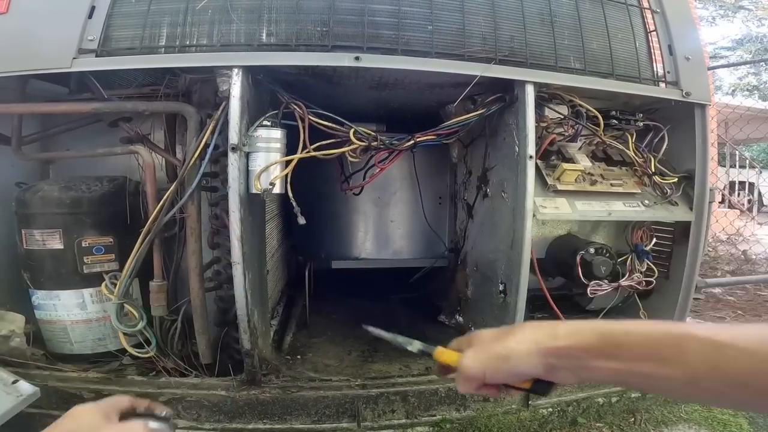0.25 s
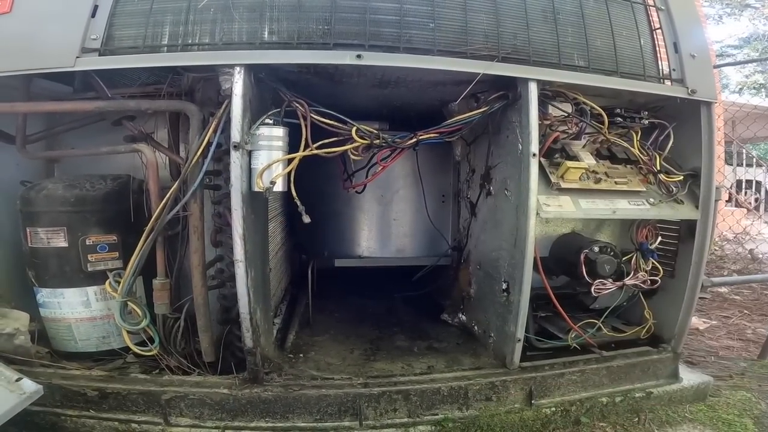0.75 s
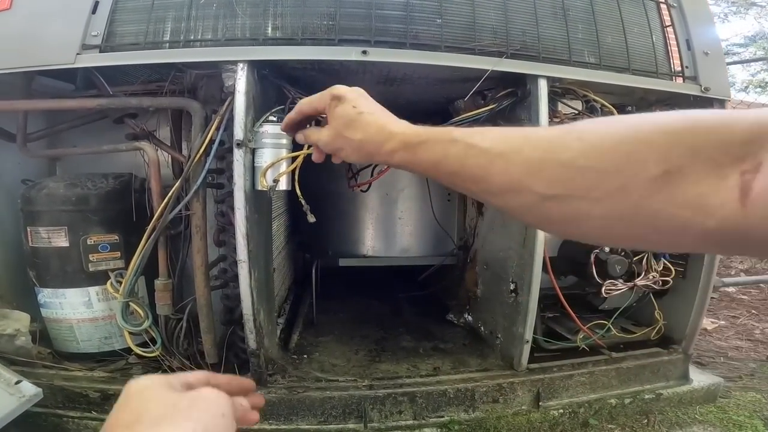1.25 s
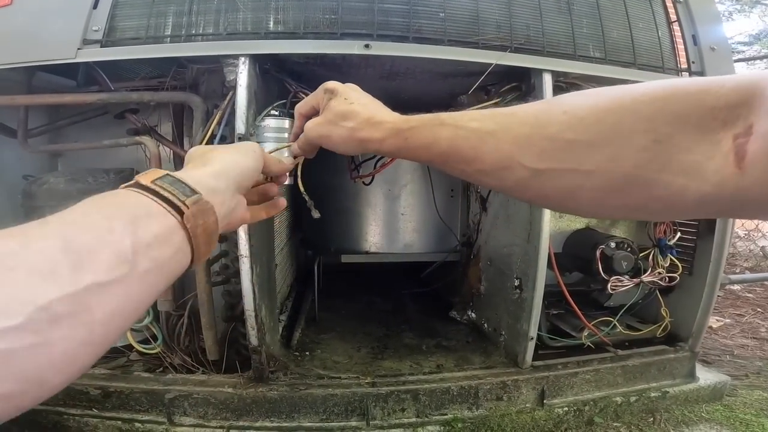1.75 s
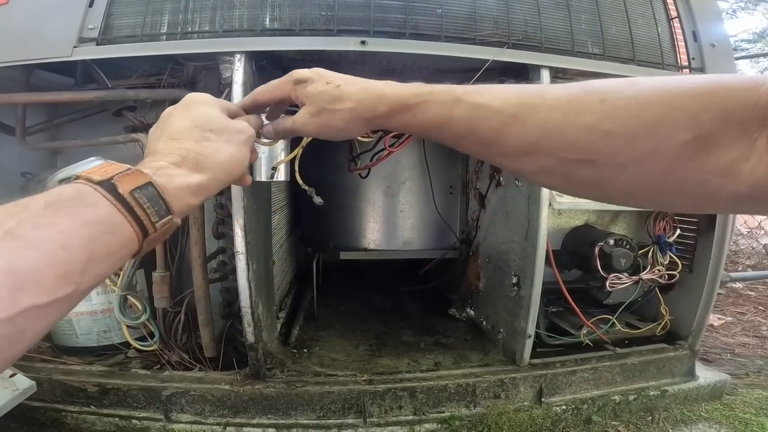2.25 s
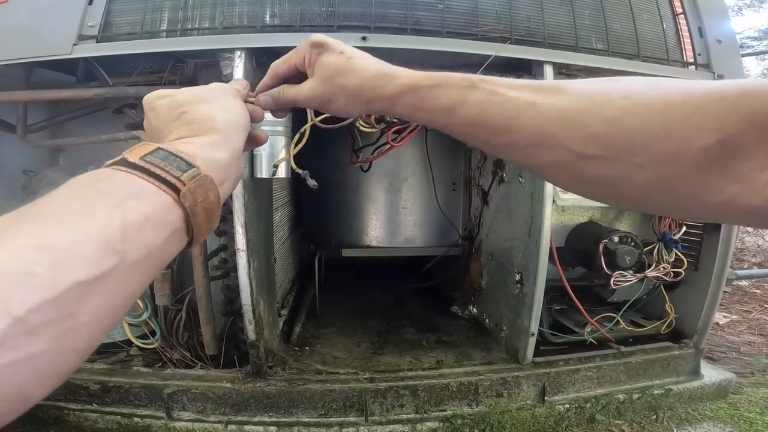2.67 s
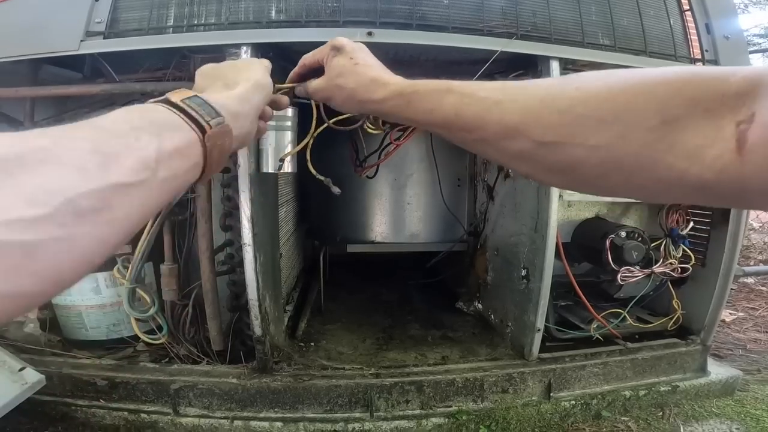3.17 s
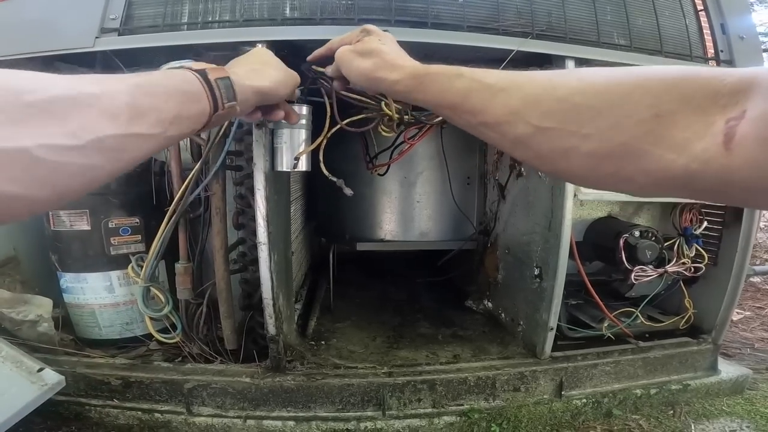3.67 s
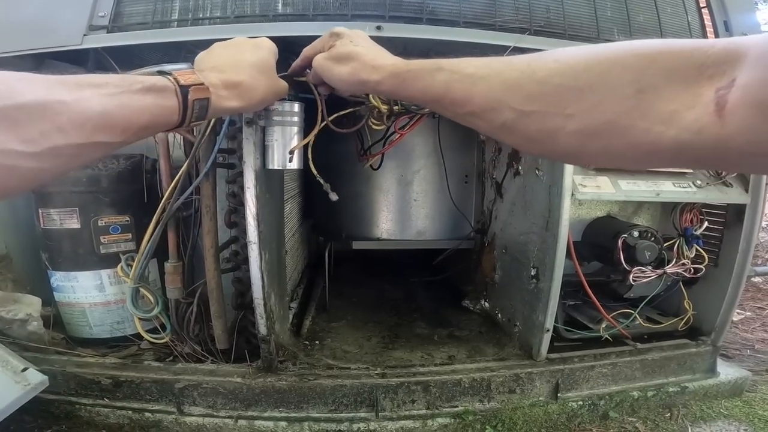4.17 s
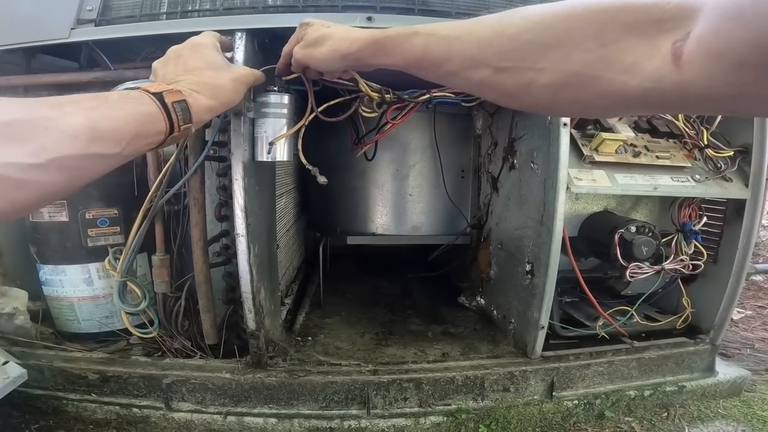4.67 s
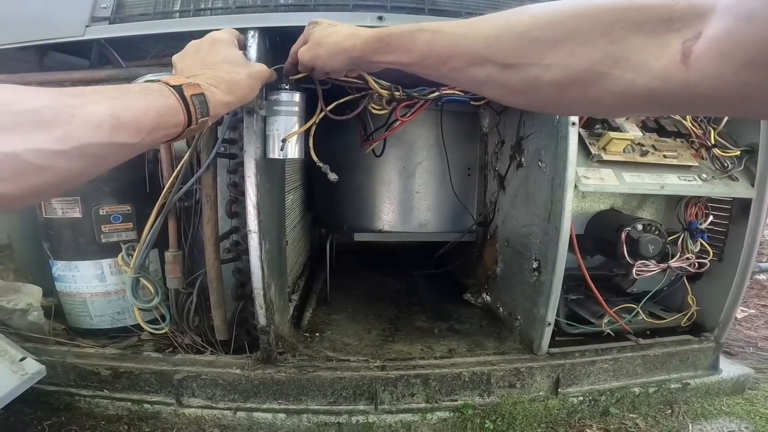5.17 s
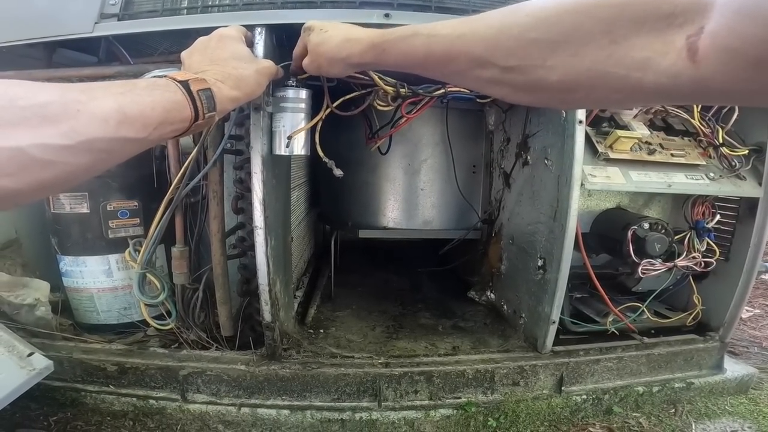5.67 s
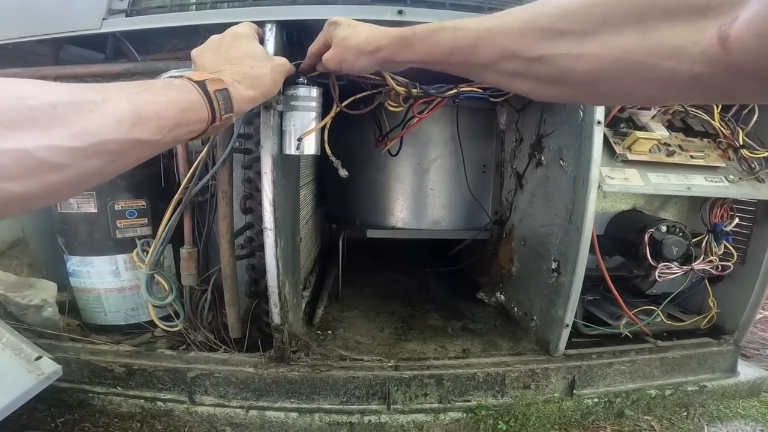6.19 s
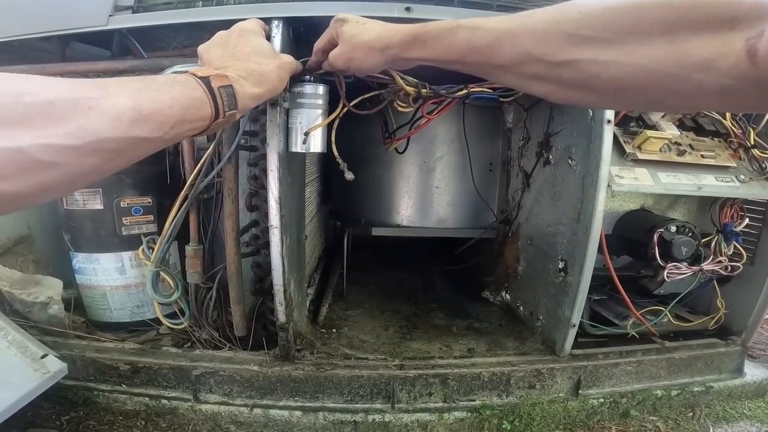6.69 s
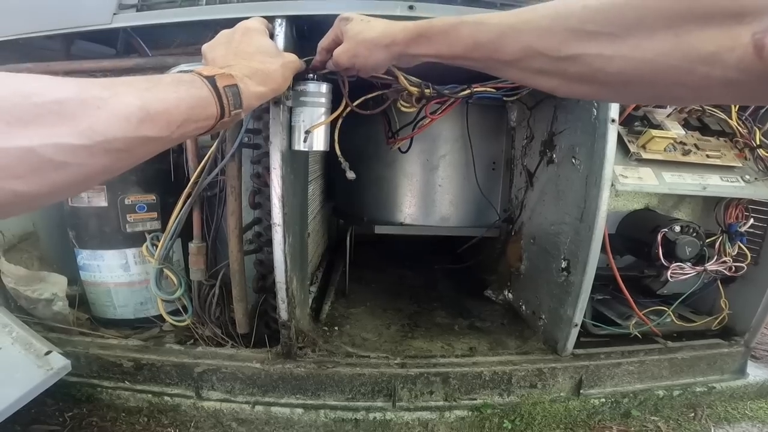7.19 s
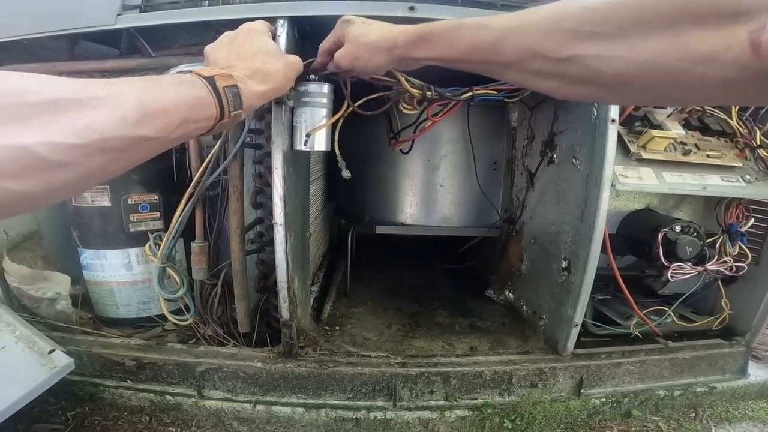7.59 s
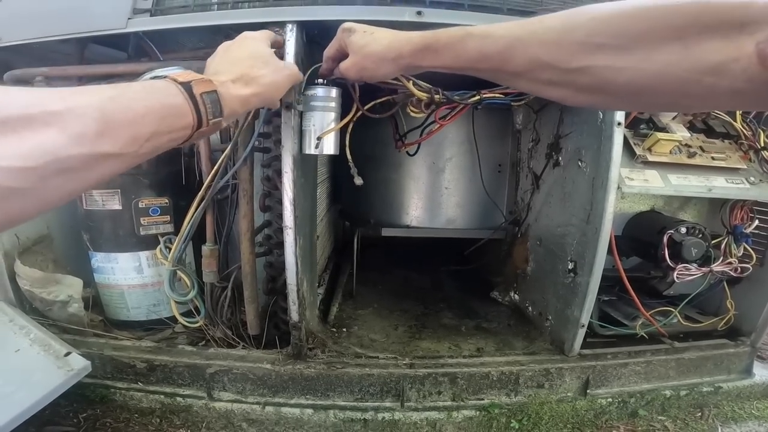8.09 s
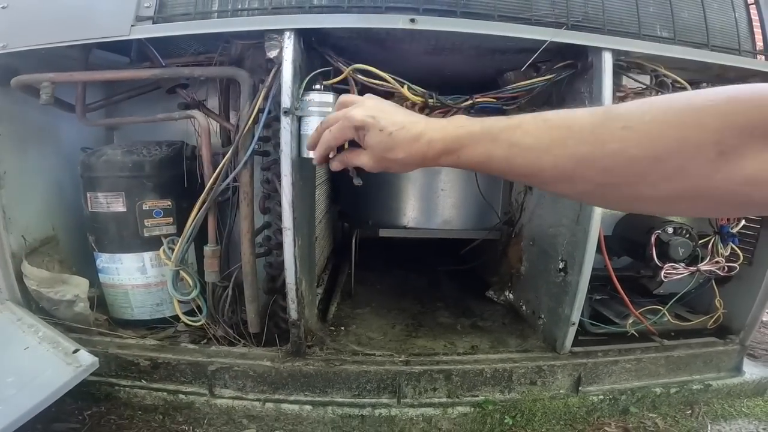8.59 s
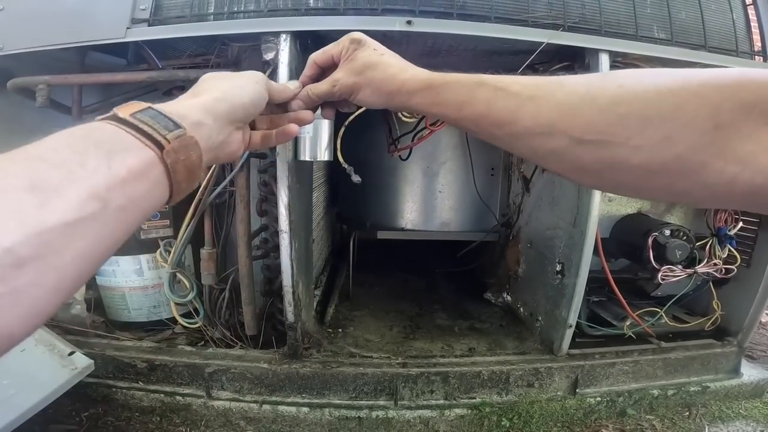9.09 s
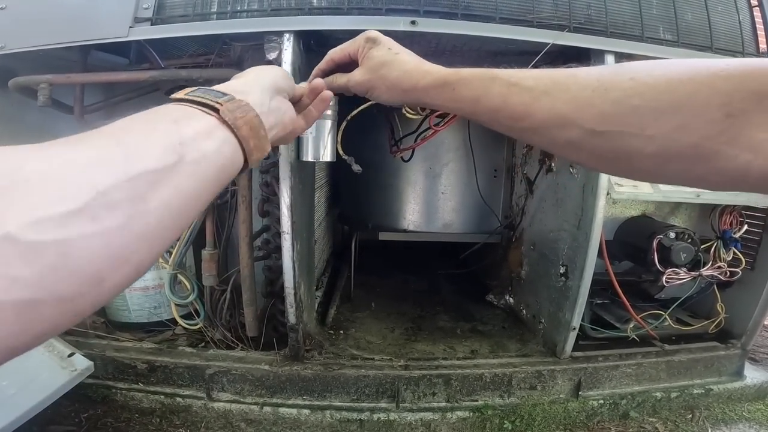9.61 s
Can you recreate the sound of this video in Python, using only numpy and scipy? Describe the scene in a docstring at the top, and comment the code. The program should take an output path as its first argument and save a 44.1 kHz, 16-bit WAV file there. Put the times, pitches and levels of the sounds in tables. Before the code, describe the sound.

Low machine hum and birdsong outdoors; one loud tool clack with yard echoes, followed by close, fiddly clicks, knocks and gritty metal scrapes.

```python
"""Outdoors beside an open air conditioner: machinery hums and rumbles quietly from filtered noise, songbirds
whistle in gliding notes and a breeze puffs at the microphones. After a few ticks, a hand tool is put down
near one second in with a sharp clack of damped modes, and the yard returns echoes; low hoots come from far
away, early and late. Then fingers work spade connectors onto a capacitor: noise bursts tick and knock, friction
grains scrape, a spade rasps home and a tight one creaks in slips. The machinery's drone swells near the end."""
import sys
import numpy as np
from scipy import signal
from scipy.fft import rfft, irfft
from scipy.io import wavfile
from scipy.ndimage import uniform_filter1d

SR = 44100
rng = np.random.default_rng(int(sys.argv[2]) if len(sys.argv) > 2 else 0)


def master_out(mix):
    """Clip the mix to full scale and print it as 16-bit PCM to the path in sys.argv[1]."""
    frames = np.transpose(np.atleast_2d(mix))
    ceiling = np.clip(frames, -1, 1)
    pcm = np.round(ceiling * 32767).astype(np.int16)
    wavfile.write(sys.argv[1], SR, pcm)


N = 434385


def amp(db):
    """Decibels to gain."""
    return 10 ** (np.asarray(db) / 20)


def evened(x):
    """Scales to rms 1."""
    return x / np.sqrt(np.mean(x ** 2) + 1e-20)


def read(points, hz):
    """Joins (Hz, value) points on a log-frequency axis."""
    f, value = np.transpose(points)
    return np.interp(np.log(hz + 1), np.log(f + 1), value)


def curve(rows):
    """Gain at every sample from (s, dB) rows."""
    return amp(np.interp(np.arange(N) / SR, *np.transpose(rows)))


def sway(length_s):
    """A random control of rms 1 that changes course every length_s."""
    steps = np.arange(N) / SR / length_s
    return evened(np.interp(steps, np.arange(1024), rng.standard_normal(1024)))


def add(mix, s, sound):
    """Mixes a sound in at time s."""
    part = mix[..., max(round(s * SR), 0):][..., :sound.shape[-1]]
    part += sound[..., :part.shape[-1]]


def pair(size, side_db):
    """White noise at two close microphones: a shared part and an opposed part."""
    mid, side = rng.standard_normal((2, size))
    return np.array([mid + amp(side_db) * side, mid - amp(side_db) * side])


def coloured(x, tone, tilt_db=0, size=2048):
    """Passes x through a body with the given spectrum; it rings after the blow, never before."""
    hz = abs(np.fft.fftfreq(size, 1 / SR))
    tilt = tilt_db * np.log2(np.maximum(hz, 250) / 2000)  # dB per octave about 2 kHz
    log_gain = np.log(amp(np.maximum(read(tone, hz), -100) + tilt))
    minimum_phase = np.exp(np.conj(signal.hilbert(log_gain)))
    taps = np.fft.ifft(minimum_phase).real[:size // 2]
    return signal.oaconvolve(x, taps[None], axes=1)[:, :x.shape[1]]


def reflections(x, t60, treble_t60, size=32768):
    """Sparse echoes of random sign, alike on both sides only in the bass; the treble has its own decay."""
    echoes_per_s, shared_hz = 3000, 900
    taps = rng.standard_normal((2, size)) * (rng.random((2, size)) < echoes_per_s / SR)
    hz, t, z = signal.stft(taps, SR, nperseg=256)
    same = 1 / (1 + (hz[:, None] / shared_hz) ** 2)
    z = np.array([z[0], same * z[0] + np.sqrt(1 - same ** 2) * z[1]])
    decay = read([(500, t60), (8000, treble_t60)], hz)[:, None]
    tail = signal.istft(z * amp(-60 * t / decay), SR, nperseg=256)[1]
    return signal.oaconvolve(x, tail / np.linalg.norm(tail[0]), axes=1)[:, :N]


def ringing(modes):
    """What a part does after one blow: its modes die away."""
    t = np.arange(SR // 3) / SR
    return sum(amp(db - 60 * t / t60) * np.sin(2 * np.pi * hz * t) for hz, db, t60 in modes)


def contact(tone, db, tilt_db, t60, side_db=-12, size=4096):
    """A burst of tiny collisions colours itself in the part it hits; db is its level over 5 ms."""
    decay = amp(-60 * np.arange(size) / SR / t60)
    burst = coloured(pair(size, side_db) * decay, tone, tilt_db)
    return amp(db) * evened(burst) * np.sqrt(.005 * SR / size)


def contacts(rows, tone):
    """Plays (s, dB, tilt dB per octave, t60 s) contacts on one part."""
    out = np.zeros((2, N))
    for s, db, tilt_db, t60 in rows:
        add(out, s, contact(tone, db, tilt_db, t60))
    return out


# steady outdoor noise: pitch_hz, level_db (per Hz)
AIR_TONE = [(15, -16), (30, -2.5), (110, -5.5), (165, -14), (210, -20.5), (420, -25.5), (750, -36.5),
            (1350, -35), (1900, -40), (2600, -51), (4000, -56.5), (7500, -57.5), (11000, -70.5),
            (15000, -81)]
# how far the two microphones differ in it: pitch_hz, side_level_db
AIR_SIDE = [(60, -41.5), (200, -13.5), (400, -14.5), (800, -6.5), (2400, -6), (8000, -5.5)]


def air():
    """Steady outdoor noise; long waves reach both microphones alike."""
    hz = np.fft.rfftfreq(N, 1 / SR)
    mid, side = rfft(rng.standard_normal((2, N))) * amp(read(AIR_TONE, hz))
    side = side * amp(read(AIR_SIDE, hz))
    return amp(-41.5) * evened(irfft(np.array([mid + side, mid - side]), N))


# stronger puffs of breeze: peak_s, length_s, level_db
PUFFS = [(3.194, 0.21, -30.5), (5.198, 0.3, -35.5), (6.24, 0.34, -29), (7.399, 0.16, -24.5),
         (8.18, 0.54, -34.5), (8.794, 1, -34)]


def puffs():
    """The smooth rise and fall of each stronger puff."""
    t = np.arange(N) / SR
    return sum(amp(db) * np.exp(-np.pi * ((t - s) / length) ** 2 * 2) for s, length, db in PUFFS)


EDDY_DB, GUST_DB, GUST_S = -46, 4.5, 0.33  # breeze: level, depth and step length of its random sway


def breeze(gusts):
    """Eddies at each microphone: independent low noise that sways and swells with the puffs."""
    hz = np.fft.rfftfreq(N, 1 / SR)
    level = np.hypot(amp(EDDY_DB + GUST_DB * sway(GUST_S)), gusts)
    eddies = evened(irfft(rfft(rng.standard_normal((2, N))) / (1 + (hz / 12) ** 4), N))
    return level * eddies * amp([[-4], [3]])  # left, right


def humming(lines):
    """Noise in narrow resonances: tones that waver in pitch and level."""
    hz = np.fft.rfftfreq(N, 1 / SR)
    bands = sum(amp(db) / np.sqrt(width) / (1 + ((hz - f) / width) ** 2) for f, width, db in lines)
    return irfft(rfft(pair(N, side_db=-30)) * bands, N) * np.sqrt(SR / np.pi)


# spectrum of the machinery's rumble: pitch_hz, level_db (per Hz)
RUMBLE_TONE = [(8, 7.5), (22, 6), (40, -5), (80, -5.5), (110, -9), (170, -25.5), (400, -86)]
# motor hum: pitch_hz, width_hz, level_db
MOTOR_HUM = [(160.6, 15, -59.5), (235.3, 5.9, -57), (397, 44, -65)]
# deep drone of the machinery: pitch_hz, width_hz, level_db (before the swell)
DRONE = [(116, 4.2, -53)]
# the drone swells late, then falls back: time_s, gain_db
DRONE_SWELL = [(0, -2), (6, 1), (8.9, 10), (9.55, 14), (9.8, -7)]
RUMBLE_DB, RUMBLE_GROWTH_DB_PER_S = -47, 0.78  # the rumble creeps up slowly
PUFF_RUMBLE_DB = -3  # how much a puff adds to the rumble


def machinery(gusts):
    """Low rumble of filtered noise, wavering motor hum and a swelling drone."""
    hz, t = np.fft.rfftfreq(N, 1 / SR), np.arange(N) / SR
    level = np.hypot(amp(RUMBLE_DB + RUMBLE_GROWTH_DB_PER_S * t), amp(PUFF_RUMBLE_DB) * gusts)
    rumble = evened(irfft(rfft(pair(N, side_db=-33)) * amp(read(RUMBLE_TONE, hz)), N))
    return level * rumble + humming(MOTOR_HUM) + humming(DRONE) * curve(DRONE_SWELL)


def outdoors():
    """Steady air, nearby machinery and the breeze at the microphones."""
    gusts = puffs()
    return air() + machinery(gusts) + breeze(gusts)


def whistled(notes):
    """Each note glides through its three pitches with its own random warble."""
    song = np.zeros((1, N))
    wobble = evened(uniform_filter1d(rng.standard_normal(N), size=96))
    for s, length, start, middle, end, db, warble in notes:
        u = np.linspace(0, 1, int(length * SR))
        glide = np.polyval(np.polyfit([0, .5, 1], [start, middle, end], 2), u)
        hz = glide * (1 + warble * wobble[round(s * SR):][:len(u)])
        add(song, s, amp(db) * signal.windows.tukey(len(u), .4) * np.sin(2 * np.pi * np.cumsum(hz) / SR))
    return song


# the farthest bird's figure, one note a row:
# offset_s, length_s, start_hz, middle_hz, end_hz, level_db, warble (share of the pitch)
FIGURE = [(0, 0.064, 2570, 2828, 2825, 0, .018), (.03, 0.049, 2750, 2554, 2360, -4.5, .035),
          (0.1, .05, 5500, 4500, 3600, -2, .055), (0.126, 0.07, 3230, 3230, 3390, -.5, .022),
          (0.169, 0.034, 3370, 3900, 4370, 0, .035)]
# when the figure sounds: start_s, level_db
FIGURE_TIMES = [(2.528, -64.5), (2.868, -63.5), (3.226, -64), (3.595, -64.5), (8.4, -64), (8.751, -63.5),
                (9.11, -66)]


def far_bird():
    """One songbird repeats a figure; it arrives only as early and late echoes."""
    notes = [(s + at, *shape, db + note_db, warble)
             for s, db in FIGURE_TIMES for at, *shape, note_db, warble in FIGURE]
    song = whistled(notes)
    early = amp(2.0) * reflections(song, t60=0.19, treble_t60=0.27)
    late = amp(6.5) * reflections(song, t60=1.0, treble_t60=0.97)
    return early + late


NEAR_WARBLE = 0.028  # share of the pitch


def sung(call, times):
    """The notes of one call, repeated at each time, pitch and level."""
    return [(s + at, length, hz * start, hz * middle, hz * end, db + note_db, NEAR_WARBLE)
            for s, hz, db in times for at, length, start, middle, end, note_db in call]


# faint low hoots from far away: start_s, length_s, pitch_hz, level_db, roughness (share of the pitch)
HOOTS = [(0.999, 0.192, 606, -68, 0.0081), (1.387, 0.16, 626, -57.5, .11), (1.624, 0.34, 769, -73, 0.016),
         (8.2, 0.333, 609, -59, 0.151), (8.718, 0.14, 657, -65, 0.014)]
HOOT_SAG = 0.94  # a hoot ends on this share of its pitch


def hoots():
    """Low notes that sag in pitch, rough by random warble."""
    return [(s, length, hz, hz, hz * HOOT_SAG, db, rough) for s, length, hz, db, rough in HOOTS]


# two calls, one note a row: offset_s, length_s, start, middle, end (shares of the call's pitch), level_db
UPSLUR = [(0, .035, .84, 0.92, 1.12, -2), (.025, .055, 1.04, 0.99, .86, 0.46)]
CHIRP = [(0, 0.0242, 1, 0.94, 1.25, 2), (.024, 0.035, 0.73, .85, 0.81, -8)]
# when each call sounds: start_s, pitch_hz, level_db
UPSLUR_TIMES = [(1.287, 4390, -67), (5.313, 4060, -72), (5.37, 4360, -72)]
CHIRP_TIMES = [(1.125, 2450, -68), (1.16, 2400, -69), (4.532, 2500, -63), (4.778, 2460, -63.5),
               (4.852, 2500, -61), (4.935, 2490, -66), (5.778, 2396, -60), (5.843, 2360, -71)]
# single whistles: start_s, length_s, start_hz, middle_hz, end_hz, level_db, warble (share of the pitch)
WHISTLES = [(.335, .1, 4590, 4920, 4870, -66, .016), (.36, 0.15, 3070, 3100, 3065, -65.5, 0.031),
            (0.758, 0.037, 4050, 4220, 4330, -68.5, .02), (0.783, 0.054, 2970, 3115, 3070, -62.5, .02),
            (0.952, 0.16, 3560, 3510, 3430, -67, .028), (1.489, 0.048, 2500, 2570, 2560, -66.5, 0.018),
            (2.315, 0.078, 3250, 3650, 4340, -72.5, .05), (3.15, .11, 5100, 5100, 5090, -76, 0.013),
            (3.78, 0.12, 5930, 6000, 5860, -79, 0.0091), (4.57, 0.037, 2190, 2170, 2100, -66, .014),
            (4.872, .05, 2197, 2130, 2100, -62, .012), (5.857, 0.073, 4000, 3810, 3660, -63.5, 0.017),
            (5.905, 0.065, 3740, 3470, 3250, -63, .045), (5.974, 0.055, 2840, 2770, 2680, -58.5, .014),
            (9.351, 0.084, 5360, 5470, 5100, -64.5, 0.012), (9.399, 0.1, 5120, 4440, 4430, -64, .014),
            (9.35, 0.1, 2745, 2600, 2140, -66, .015), (9.431, 0.064, 3240, 3140, 3100, -67, .014)]
NEAR_DB, NEAR_SCATTER_DB, NEAR_ECHO_DB = 2, 0.5, 3  # direct sound, early scatter, late echo


def birds():
    """Trees and walls blur the calls, whistles and hoots; the farthest bird joins them."""
    song = whistled(sung(UPSLUR, UPSLUR_TIMES) + sung(CHIRP, CHIRP_TIMES) + WHISTLES + hoots())
    scatter = amp(NEAR_SCATTER_DB) * reflections(song, t60=.2, treble_t60=0.18)
    echo = amp(NEAR_ECHO_DB) * reflections(song, t60=0.96, treble_t60=0.9)
    return amp(NEAR_DB) * song + scatter + echo + far_bird()


BLOW_S = 0.9244  # when the tool lands hardest
# what the ground throws back: pitch_hz, level_db (per Hz)
YARD_TONE = [(80, -3), (250, 2), (450, 4), (950, 0), (1400, -4), (1900, -9), (2400, -7), (3300, -7),
             (4800, -11), (8000, -17), (11000, -25), (15000, -36)]
# nearby surfaces return the clack: delay_s, level_db
WALL_ECHOES = [(.055, -14), (.08, -29)]
YARD_DB = -7  # strength of the sound that the yard scatters


def yard():
    """The ground scatters the clack into a smooth broad tail; nearby walls throw back smeared echoes."""
    blow = np.zeros((1, N))
    blow[0, round(BLOW_S * SR)] = 1
    spread = coloured(blow, YARD_TONE)
    spread = amp(YARD_DB) * spread / np.linalg.norm(spread)
    out = reflections(spread, t60=0.14, treble_t60=0.23)
    scatter = pair(2048, side_db=-4) * np.hanning(2048)
    echo = signal.oaconvolve(spread, scatter / np.linalg.norm(scatter[0]), axes=1)
    for delay, db in WALL_ECHOES:
        add(out, delay, amp(db) * echo)
    return out


# the tool grazes, lands and settles: time_s, level_db (relative)
LANDING = [(0.9115, -32), (0.9221, -8.5), (0.9232, -13.5), (0.924, 0), (0.927, -14)]
# ring of the tool: pitch_hz, width_hz (before the ground's loss), level_db (relative)
TOOL_MODES = [(935, 25, 1), (1150, 14, -13), (1370, 48, -2), (1530, 48, -7), (1915, 45, -10),
              (2340, 50, -6), (2980, 40, -12), (3280, 45, -10), (4180, 33, -10), (4715, 60, -.5),
              (5210, 70, -1), (5385, 110, -6), (5750, 120, -11), (6750, 54, -18), (7610, 59, -8),
              (7850, 89, -12), (8600, 130, -15)]
# crack of each touch: pitch_hz, level_db (per Hz)
CLACK_TONE = [(80, 6), (250, 2.5), (420, 7.5), (620, 0.5), (950, -3), (1380, -2.5), (1800, -13.5),
              (2330, -13), (3240, -9.5), (3800, -15), (4800, -7), (6200, -16.5), (8000, -18.5),
              (15000, -41)]
# the slab under the unit: pitch_hz, level_db, t60_s
SLAB_MODES = [(238, -2.5, 0.17), (354, 4.5, 0.066), (457, -1.5, 0.11), (604, 1.5, 0.097),
              (720, -16.5, 0.12), (1000, -7, 0.16), (1170, -12, 0.16)]


def tool():
    """Each touch of the landing tool cracks and rings its damped modes."""
    t, out = np.arange(SR // 4) / SR, np.zeros((2, N))
    loss = .008  # lying on the ground damps the high modes most
    ring = sum(amp(db) * np.exp(-np.pi * (width + loss * hz) * t) * np.sin(2 * np.pi * hz * t)
               for hz, width, db in TOOL_MODES)
    ring = amp(-8) * ring / abs(ring).max()
    for s, db in LANDING:
        add(out, s, amp(db) * ring)
        add(out, s, contact(CLACK_TONE, db - 18.5, tilt_db=2.0, t60=0.021, side_db=-12.5))
    add(out, BLOW_S, amp(-34.5) * ringing(SLAB_MODES))  # the main blow thuds in the slab
    return out * amp([[-.5], [.5]])


# a spade taps the terminal post and jolts the cabinet: time_s, ring_level_db, pitch_hz, jolt_level_db
TAPS = [(0.471, -36.5, 1236, -43.5), (0.53, -45, 1320, -56), (4.107, -48, 1660, -49), (5.2, -42, 1730, -66),
        (6.364, -43, 1750, -46.5), (6.809, -38, 1446, -67), (6.812, -35.5, 956, -48),
        (8.047, -42, 1630, -51), (8.072, -37.5, 1610, -51), (8.123, -38, 1650, -67),
        (8.171, -49, 1670, -48)]
POST_T60_S, JOLT_TILT_DB, JOLT_T60_S = 0.03, 4.5, 0.078  # tilt in dB per octave


def post():
    """The terminal post rings briefly; its pitch depends on how the fingers hold it."""
    t, out = np.arange(4096) / SR, np.zeros(N)
    for s, db, hz, _ in TAPS:
        add(out, s, amp(db - 60 * t / POST_T60_S) * np.sin(2 * np.pi * hz * t))
    return out


# dull knocks of wire on the cabinet: time_s, level_db, tilt_db_per_octave, t60_s
WIRE_KNOCKS = [(0.412, -54, 14, .02), (0.424, -45, 9.5, 0.052), (1.656, -50, 4.5, 0.025),
               (3.954, -36, 1.5, 0.1), (4.013, -42.5, 1.5, 0.099), (4.159, -46, 3, 0.047),
               (4.904, -46, 7.5, 0.071), (6.21, -49, 0.5, 0.069), (6.8085, -43, 2.5, 0.054),
               (6.858, -46.5, 4, 0.084), (7.160, -50.5, 6.5, 0.08), (7.408, -54, -2.5, .04),
               (7.463, -53.5, 0.5, .04), (7.826, -46, 3, 0.055), (7.886, -47, -1, 0.042),
               (8.822, -52.5, 8.5, 0.045)]


def knocks():
    """Every blow to the cabinet: the wires' own and the jolts from the post."""
    return WIRE_KNOCKS + [(s, jolt_db, JOLT_TILT_DB, JOLT_T60_S) for s, _, _, jolt_db in TAPS]


# sheet metal of the cabinet: pitch_hz, level_db, t60_s
PANEL_MODES = [(253.6, 5, 0.26), (283.8, 4, 0.28), (374.4, -2, 0.31), (393.7, -2, 0.57), (586, -5.5, 0.26)]


def panel():
    """The sheet metal booms under each knock, relatively more for a duller blow."""
    blows = np.zeros(N)
    for s, db, tilt_db, _ in knocks():
        blows[round(s * SR)] = amp(db - 2.5 * tilt_db - 3.0)
    return signal.oaconvolve(blows, ringing(PANEL_MODES))[:N]


# spectrum of a knock on the cabinet: pitch_hz, level_db (per Hz)
KNOCK_TONE = [(100, -15), (280, 13.5), (550, 6.5), (950, 3.5), (1250, -2), (1700, -3.5), (2400, -26),
              (5000, -30), (14000, -70)]


def knocking():
    """Wires and jolts strike the cabinet in dull bursts."""
    return contacts(knocks(), KNOCK_TONE)


CRACKLE_PER_S, CRACKLE_SPREAD_DB, CRACKLE_S = 700, 2.6, .0015  # tiny catches: rate, size spread, decay


def crackle():
    """The uneven force of dry friction, rms 1: tiny catches of random size that die at once."""
    sizes = amp(CRACKLE_SPREAD_DB * np.minimum(rng.exponential(1, N), 4))
    catches = sizes * (rng.random(N) < CRACKLE_PER_S / SR)
    power = signal.lfilter([1], [1, -np.exp(-2 / (CRACKLE_S * SR))], catches ** 2)
    return evened(np.sqrt(power / power.mean() + .3))  # .3 keeps a steady floor between catches


# the tool grazes the ground (row at .78 s); the other strokes are fingers, wires and spades
# dragging over metal: start_s, length_s, dull_level_db, bright_level_db
STROKES = [(0, 0.043, -65, -61), (0.197, 0.28, -70, -65), (.78, 0.19, -75, -66),
           (1.277, 0.39, -61.5, -65.5), (2.242, 0.053, -75, -64), (2.412, 0.11, -80, -67.5),
           (3.941, 0.045, -66, -57), (3.999, 0.062, -53, -61.5), (4.08, 0.15, -49, -61.5),
           (4.34, 0.1, -56, -66.5), (4.62, 0.096, -53, -53.5), (4.679, 0.11, -57, -60),
           (4.82, 0.25, -70, -61), (4.995, 0.18, -75, -66), (5.738, 0.25, -66, -81),
           (6.083, 0.47, -55.5, -88), (6.84, 0.17, -54.5, -72), (7.167, 0.12, -56.5, -76),
           (7.302, 0.12, -51.5, -60), (7.448, 0.065, -62, -68), (7.576, 0.14, -51, -69),
           (7.797, 0.14, -49.5, -57.5), (8.029, 0.068, -57.5, -56), (8.099, 0.11, -59, -48),
           (8.184, 0.083, -55, -69), (9.246, 0.12, -60.5, -61)]
# the fingers' light scrape between strokes: time_s, level_db (before its sway)
FIDGET = [(2.2, -85), (3.1, -66.5), (3.85, -73), (4.3, -65), (4.55, -73.5), (5.25, -64), (5.5, -73),
          (5.8, -65), (6.1, -68), (6.65, -69), (6.75, -77), (7.3, -70.5), (7.75, -67.5), (8.3, -65),
          (9.3, -67), (9.55, -77)]
FIDGET_SWAY_DB, FIDGET_S = 3, 0.067  # random sway of that scrape, length of one step
# spectrum of the bright scrape: pitch_hz, level_db (per Hz)
SCRAPE_TONE = [(800, -13.5), (1400, 0.5), (1700, -3), (2200, -7.5), (2900, -9), (4200, -10.5),
               (7500, -12.5), (9700, -18.5), (11000, -26.5), (13500, -29.5), (15000, -42)]
# spectrum of the dull drag: pitch_hz, level_db (per Hz)
DRAG_TONE = [(120, -31.5), (280, 4.5), (450, -2), (700, -7), (1200, -13.5), (1700, -12), (2300, -19),
             (5000, -25), (12000, -78)]


def rubbing():
    """Grains of friction in a bright scrape and a dull drag: the tool's graze, then the handling of metal."""
    bright, dull = curve(FIDGET) * amp(FIDGET_SWAY_DB * sway(FIDGET_S)), np.zeros(N)
    for s, length, dull_db, bright_db in STROKES:
        stroke = np.sqrt(np.hanning(int(length * SR)))
        add(dull, s, amp(dull_db) * stroke)
        add(bright, s, amp(bright_db) * stroke)
    grains = crackle()
    scrape = bright * evened(coloured(grains * pair(N, side_db=-9), SCRAPE_TONE))
    drag = dull * evened(coloured(grains * pair(N, side_db=-30), DRAG_TONE))
    return scrape + drag


# light metal ticks: time_s, level_db, tilt_db_per_octave
TICKS = [(0.105, -51.5, -9), (0.116, -42, -10), (0.226, -60, -1), (0.29, -60.5, 6), (0.412, -51.5, -9),
         (0.471, -52, -11.5), (0.787, -62, 3), (2.257, -63, 9), (2.868, -57, -7), (2.889, -51, -2),
         (2.905, -53.5, -1), (2.935, -62, -2), (3.045, -67, 10), (3.235, -65, 15), (3.955, -57, 1),
         (4.013, -56, -3), (4.028, -57, -1), (4.163, -50, 2), (4.392, -61, 6), (4.759, -60, -4),
         (4.829, -60, 2), (4.862, -58, 0), (4.906, -55, 4), (4.932, -60, 7), (4.999, -52.5, -7),
         (5.233, -56.5, 0), (5.327, -60.5, 0), (6.045, -64, 24), (6.576, -60, 3), (6.87, -62, 3),
         (6.884, -47.5, 4.5), (6.998, -65, 5), (7.557, -63, -4), (7.679, -62, 12), (7.890, -61, 8),
         (8.276, -50.5, 0), (8.598, -60, -3), (8.825, -57, -13), (9.037, -60, 3)]
# spectrum of a tick: pitch_hz, level_db (per Hz)
TICK_TONE = [(200, -79.5), (1500, -19), (2600, 1.5), (4000, 4), (6500, 9.5), (8500, 1), (11000, -6.5),
             (15000, -29)]
TICK_T60_S = 0.032
HANDLING_S = 2  # the fingers take hold of the wires
# loose spades touch at random: rate, middle level, spread either way, tilt per octave
FAINT_TICKS_PER_S, FAINT_TICK_DB, FAINT_SPREAD_DB, FAINT_TILT_DB = 4.6, -68.5, 7.5, 3


def ticking():
    """Clear ticks of metal on metal, with faint ones scattered while the fingers work."""
    working_s = N / SR - HANDLING_S
    draws = rng.random((round(FAINT_TICKS_PER_S * working_s), 2))
    faint = [(HANDLING_S + when * working_s, FAINT_TICK_DB + FAINT_SPREAD_DB * (2 * size - 1), FAINT_TILT_DB)
             for when, size in draws]
    return contacts([(*tick, TICK_T60_S) for tick in TICKS + faint], TICK_TONE)


# a spade grinds against its post: start_s, length_s, level_db, pitch_hz
GRINDS = [(4.09, 0.19, -58.5, 1600), (4.275, .16, -67, 1600), (4.807, 0.04, -61, 1750),
          (4.9, 0.026, -62, 1650), (6.19, 0.11, -64, 1650), (6.587, 0.14, -58, 1780),
          (6.902, 0.086, -61, 1550), (7.06, 0.055, -59, 1700), (7.202, 0.094, -57, 1700),
          (7.306, 0.17, -59.5, 1580), (7.577, .12, -57.5, 1660), (7.804, 0.15, -58, 1650),
          (8.098, 0.13, -53.5, 1700), (8.22, 0.22, -63, 1600)]
# spectrum of the grind: pitch_hz, level_db (per Hz)
GRIND_TONE = [(300, -33), (900, -12), (1350, -5.5), (1650, 1), (1950, -9), (2280, -9), (2750, -11),
              (3200, -22), (3700, -15), (5000, -29), (14000, -58)]
GRIND_HZ = 1630  # the pitch at which that spectrum holds


def grinding():
    """A spade grinds on its post, whose resonances shift with each new grip."""
    grit, out = crackle() * pair(N, side_db=-10), np.zeros((2, N))
    for s, length, db, hz in GRINDS:
        part = grit[:, round(s * SR):][:, :int(length * SR)]
        tone = [(f * hz / GRIND_HZ, level) for f, level in GRIND_TONE]
        add(out, s, amp(db) * evened(coloured(part, tone)) * np.sqrt(np.hanning(part.shape[1])))
    return out


# one spade slides home in gritty catches: time_s, level_db, tilt_db_per_octave
CATCHES = [(4.6096, -37.5, 0), (4.6162, -36.5, 1), (4.6268, -37, 1.5), (4.637, -42.5, 7.5),
           (4.6405, -39.5, -4), (4.6507, -39, 1.5), (4.672, -46.5, 4), (4.7205, -54, 4)]
# spectrum of the grit: pitch_hz, level_db (per Hz)
RASP_TONE = [(350, -50), (600, -1), (754, -18), (852, -9), (1440, -4), (1720, 3), (1860, -9), (2400, -6),
             (3500, -19), (4120, -18), (5320, -23.5), (6250, -18), (15000, -50)]
# ring of the spade and its post: pitch_hz, level_db, t60_s
SPADE_MODES = [(1740, 1, 0.026), (2340, -15, 0.035), (2760, -8, 0.042), (4080, -13, 0.098),
               (6200, -17, 0.087)]
RASP_T60_S, RASP_RING_DB = 0.094, -3.5  # decay of a catch; how strongly it rings the spade


def rasp():
    """A spade slides home: each catch is a burst of grit that rings the spade and its post."""
    grit = contacts([(*catch, RASP_T60_S) for catch in CATCHES], RASP_TONE)
    for s, db, _ in CATCHES:
        add(grit, s, amp(db + RASP_RING_DB) * ringing(SPADE_MODES))
    return grit


# a tight spade is rocked forward, one sharp slip at a time: time_s, level_db
SLIPS = [(6.172, -46), (6.2078, -42), (6.2228, -44), (6.244, -41.5), (6.2616, -43), (6.504, -65),
         (6.522, -48), (6.858, -51), (7.159, -53), (7.249, -57), (7.263, -50), (7.3284, -52), (7.345, -49),
         (7.3657, -53), (7.391, -47), (7.406, -44), (7.4309, -43.5), (7.463, -41), (7.482, -43.5),
         (7.496, -44), (7.644, -53), (7.69, -49), (7.825, -44.5), (7.865, -52), (7.941, -48.5)]
# spectrum of a slip: pitch_hz, level_db (per Hz)
SLIP_TONE = [(150, 12), (700, 3.5), (1700, -0.5), (2300, -15), (3900, -3.5), (6000, -10.5), (7200, -8),
             (7780, 3.5), (8300, -17), (9300, -9), (11000, -28), (15000, -42)]
SLIP_T60_S, SLIP_TILT_DB = 0.039, 0  # tilt in dB per octave


def slipping():
    """While it is pushed, a tight spade sticks, then slips with a dry click."""
    return contacts([(s, db, SLIP_TILT_DB, SLIP_T60_S) for s, db in SLIPS], SLIP_TONE)


def connectors():
    """Ticks, knocks, the rasp of a spade sliding home and the grinding and stick-slip creak of a tight one."""
    return ticking() + knocking() + rasp() + grinding() + slipping()


def scene():
    """The hands work a little to the left and echo in the steel cabinet; the clack spreads over the yard."""
    hands = (connectors() + post() + rubbing()) * amp([[.7], [-.7]])
    work = hands + panel()
    cabinet = amp(-9.5) * reflections(work, t60=0.16, treble_t60=0.17)
    return outdoors() + birds() + yard() + tool() + cabinet + work


EDGE_HZ = 14700


def record(dry):
    """A steep low-pass: little sounds above EDGE_HZ."""
    low_pass = signal.firwin(401, EDGE_HZ, window=("kaiser", 9), fs=SR)
    return signal.oaconvolve(dry, low_pass[None], "same", axes=1)


dry = scene()
out = record(dry)
master_out(out)
```